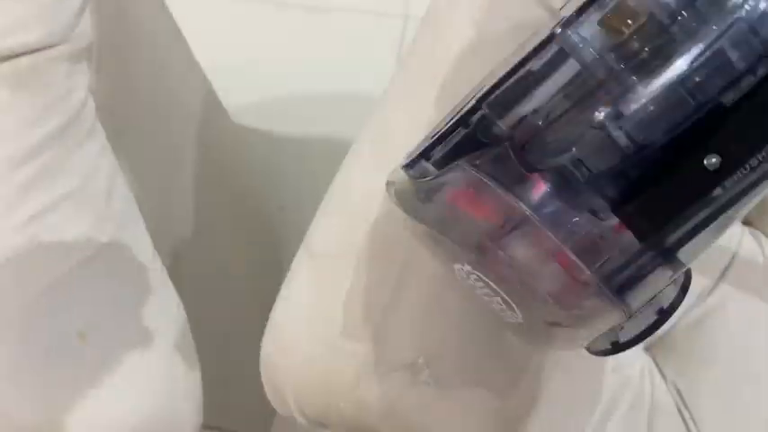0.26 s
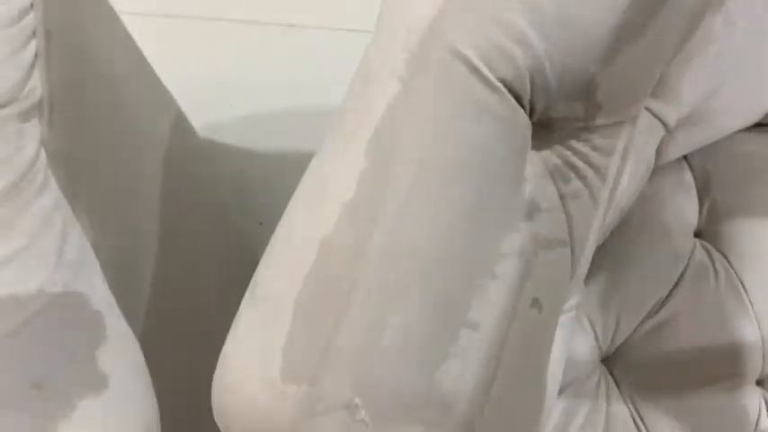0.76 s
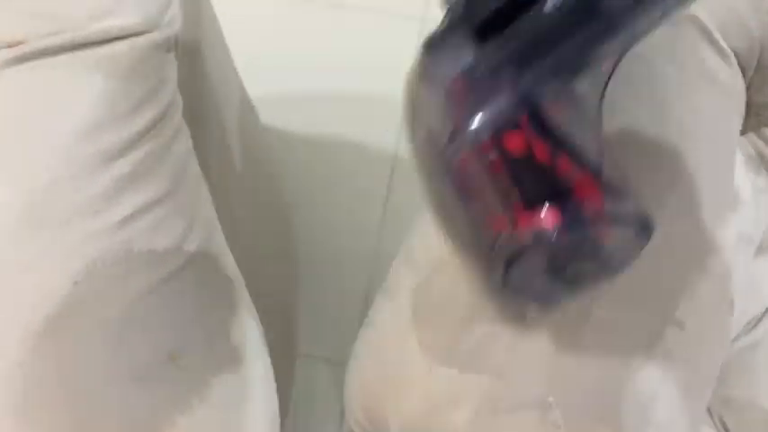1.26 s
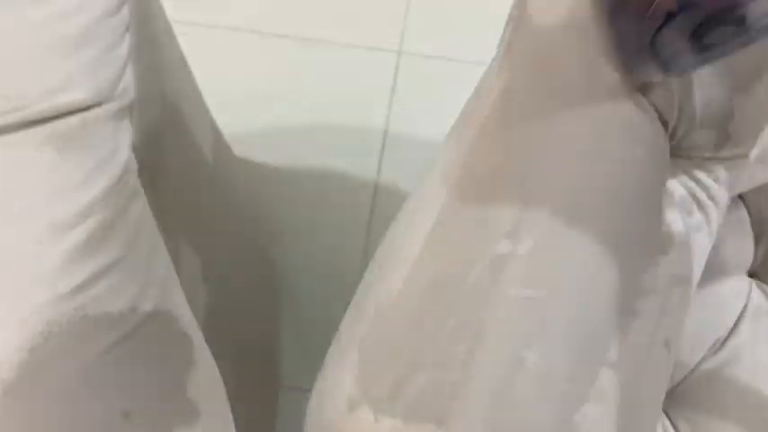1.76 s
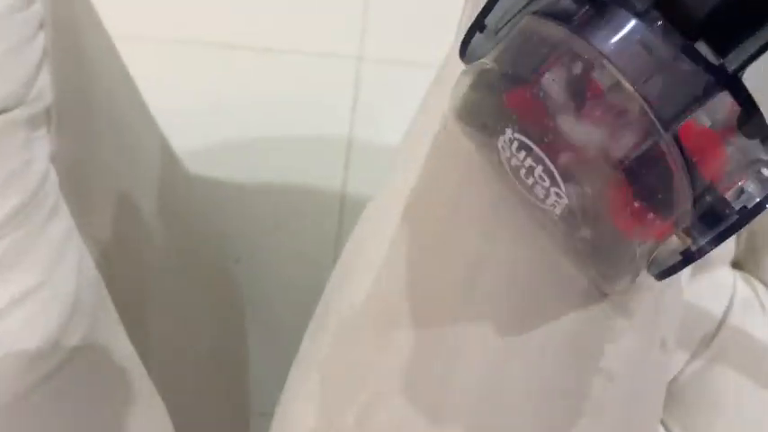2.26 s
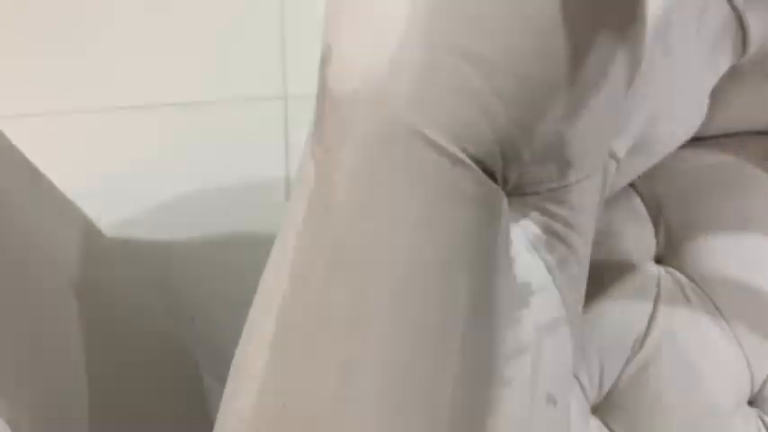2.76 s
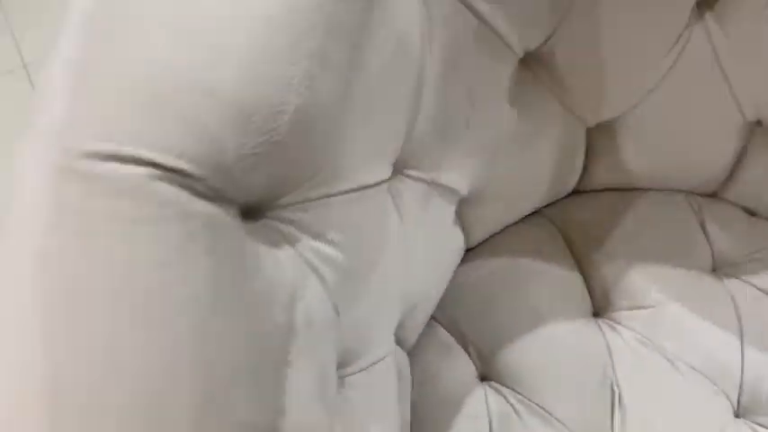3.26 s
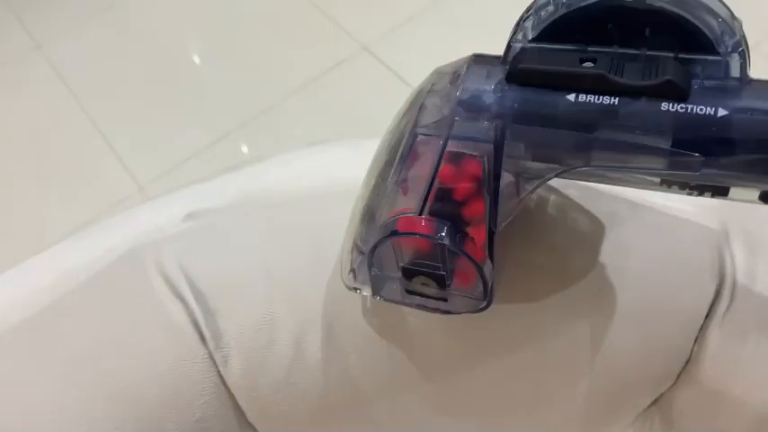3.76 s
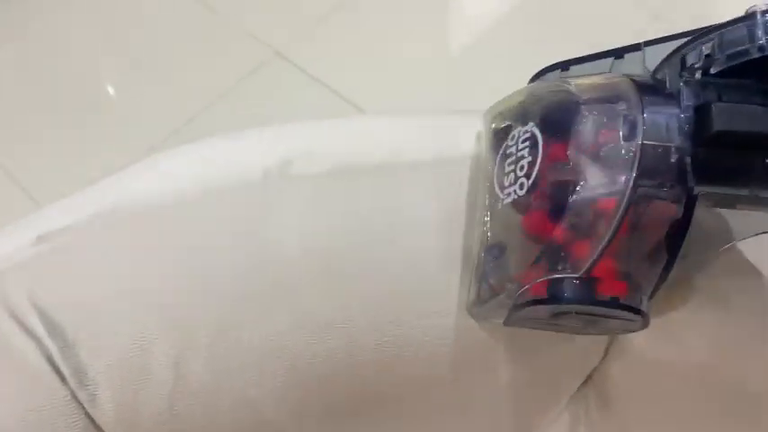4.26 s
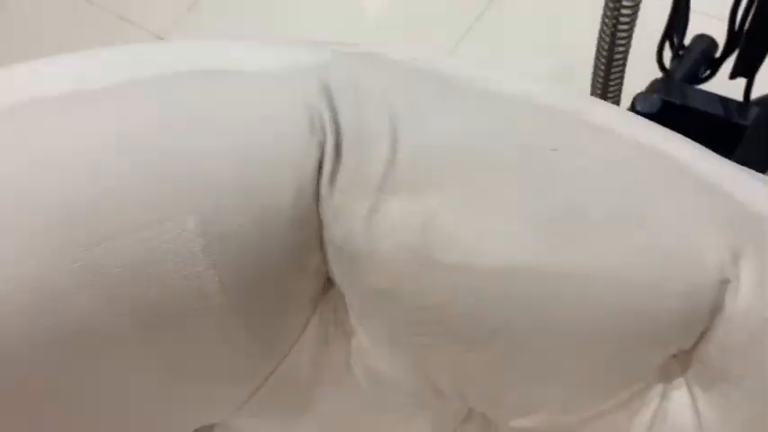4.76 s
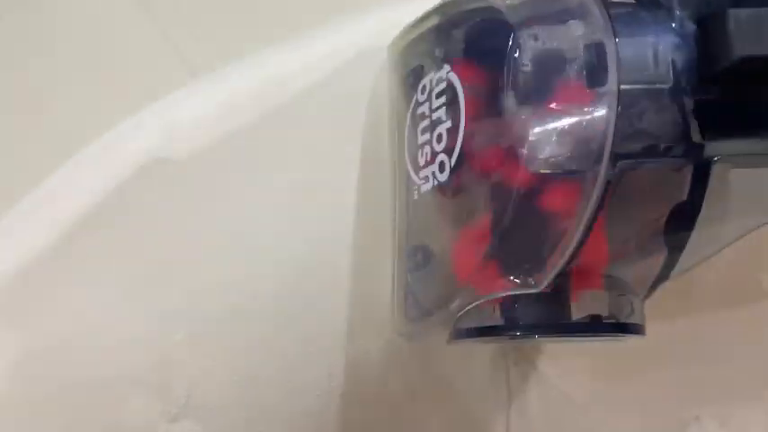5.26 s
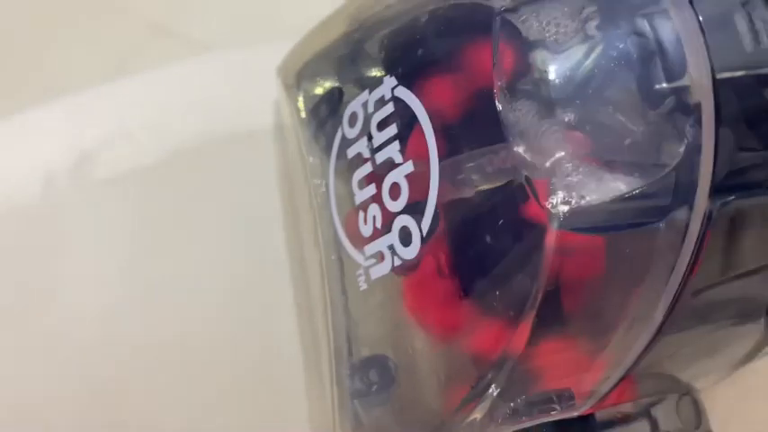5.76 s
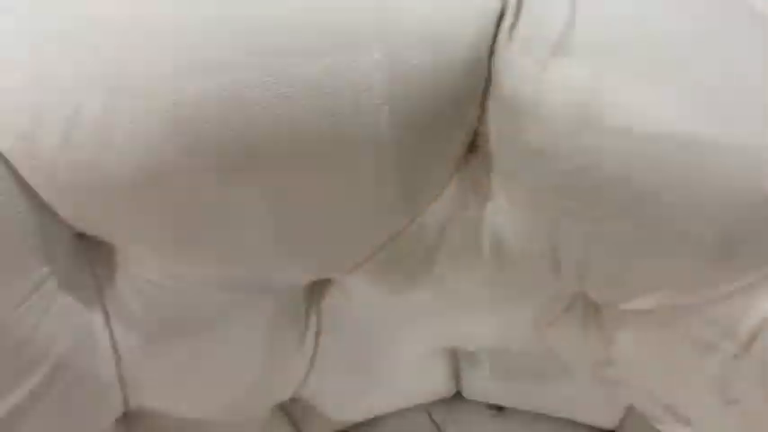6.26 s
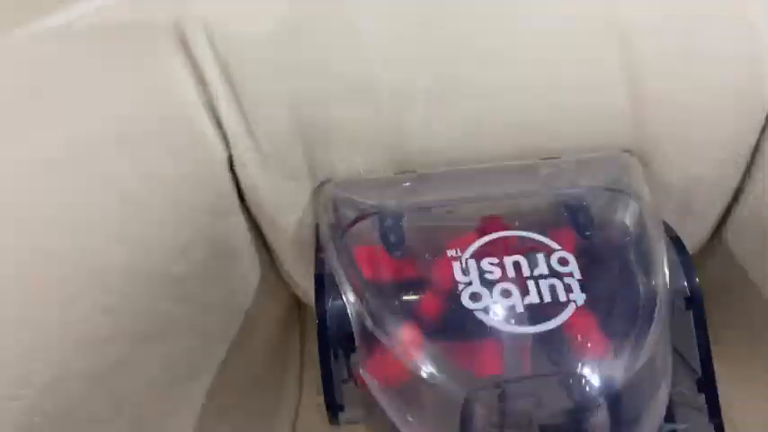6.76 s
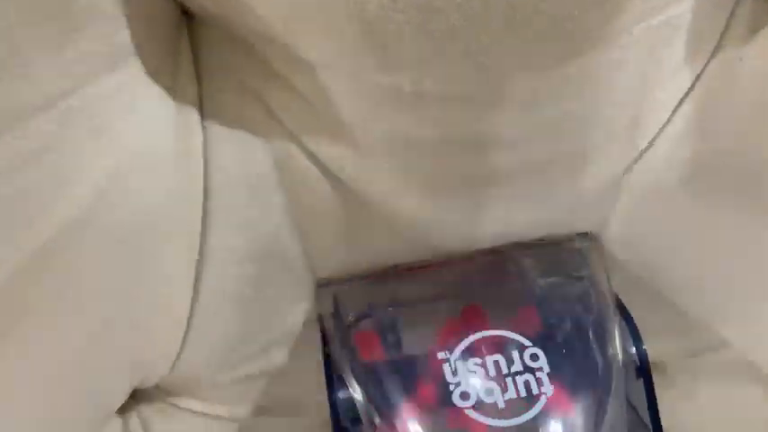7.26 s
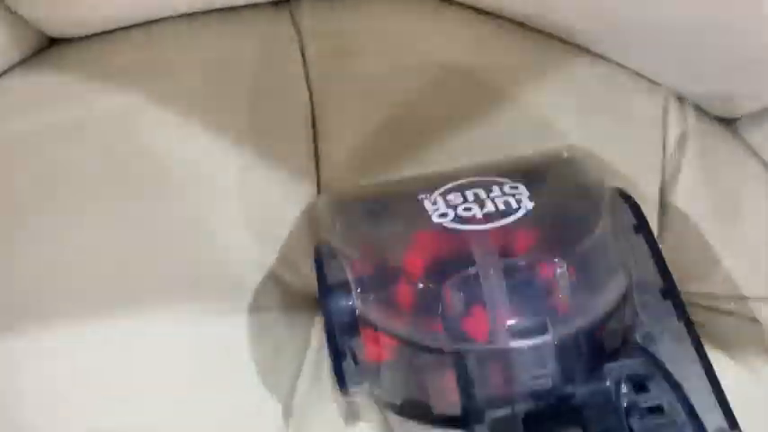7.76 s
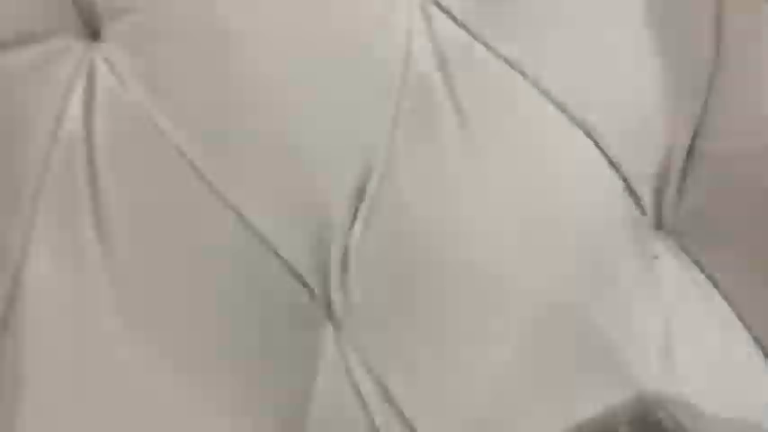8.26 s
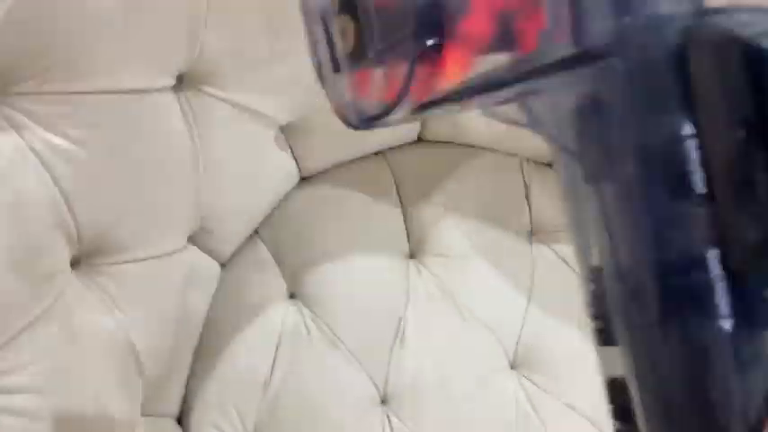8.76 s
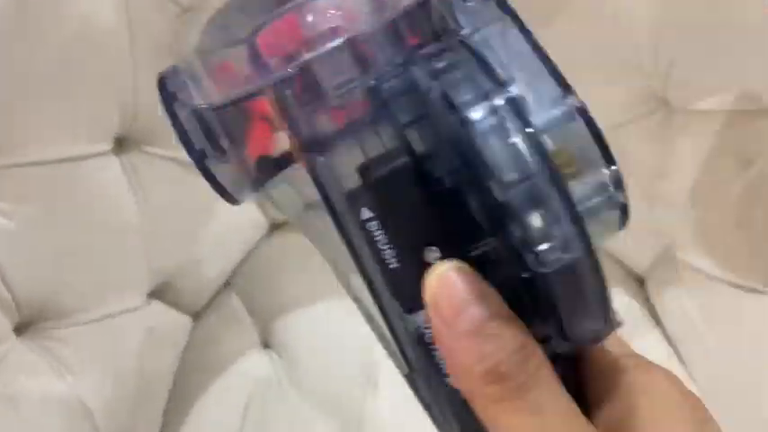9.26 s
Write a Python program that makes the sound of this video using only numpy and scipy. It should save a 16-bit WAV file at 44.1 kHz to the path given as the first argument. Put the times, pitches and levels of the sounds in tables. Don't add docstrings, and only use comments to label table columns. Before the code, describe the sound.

From the first instant an upholstery cleaner is already at full power and never stops over about 9.5 seconds. Broad airy hiss from the nozzle covers a hollow canister drone, low rumble and motor buzz. A thin steady whine near 2.8 kHz cuts through, with a fainter octave. During 0-3 s the brush turbine whistles very high, fluttering and dipping with quick strokes; hiss thins around 0.8 s, and soft bumps come near 2.1 and 2.9 s. From 3.4 s the whine jumps forward and the whistle sits lower. The head lifts around 4.7 s, bumps at 4.9, then hisses close until 6. It lifts again near 6.4 s, then presses hard around 6.8, the whistle dropping sharply. A deeper padded thud lands at 7.5 s. Near 7.9 s the fan whine steps slightly higher and continues through the last strokes to the end. Close, hand-held stereo phone indoors.

```python
import sys
import numpy as np
from scipy import signal
from scipy.fft import rfft, irfft, next_fast_len
from scipy.io import wavfile
from scipy.ndimage import uniform_filter1d, map_coordinates

SR = 44100
rng = np.random.default_rng(int(sys.argv[2]) if len(sys.argv) > 2 else 0)


def pcm_store(signal):
    levels = np.round(np.clip(np.atleast_2d(signal), -1, 1) * 32767)
    wavfile.write(sys.argv[1], SR, levels.astype(np.int16).T)


def rack_gain(trim_db):
    fader = np.asarray(trim_db, float)
    return 10 ** (fader / 20)


N = 418950

BLADE_HZ, EASED_BLADE_HZ, EASED_S, SAG_HZ_PER_S = 2836, 2913, 7.89, 4
BUZZ_PER_BLADE = .3535
OCTAVE_REST_DB = -62
VANES, TEETH = 19, 16
SPELL_EDGE_S = .07
HOLLOW_WIDTH_OCTAVES = .14
SOUND_CM_PER_S = 34300

# time_s, level_db
BLADE_LEVEL = [(2.45, -48.9), (3.03, -40.4), (3.37, -46.9), (3.44, -33.3), (4.07, -33.4), (4.9, -32.9),
               (5.05, -48.3), (5.39, -44.3), (6.13, -35.4), (6.45, -35.7), (6.65, -48.3), (6.98, -39.7),
               (7.62, -41.6), (8.37, -34.3), (8.48, -52.1), (8.63, -39.6), (8.97, -37.1), (9.51, -32.8)]
# time_s, extra_path_to_right_cm, left_shading_db
PHONE_TURN = [(0.88, 6.05, 0.0), (0.96, 5.4, 0.0), (2.53, 5.85, 0.0), (3.13, 7.6, -0.4), (3.39, 7.1, 3.4),
              (3.43, 10.3, 8.4), (4.08, 9.0, 5.0), (4.86, 11.4, -2.8), (5.02, 5.0, -0.1), (5.08, 6.05, 0.0),
              (5.24, 6.3, -0.3), (5.51, 7.6, -1.0), (6.12, 11.1, 1.1), (6.46, 11.1, 1.1), (6.56, 5.0, 0.9),
              (6.63, 3.9, 0.5), (6.95, 5.5, -0.2), (7.44, 5.68, -0.8), (7.55, 6.9, -4.0), (7.68, 6.8, -6.0),
              (7.86, 6.5, -3.0), (8.05, 6.7, -1.0), (8.11, 6.3, -0.7), (8.33, 6.45, 0.5), (8.59, 4.6, -2.6),
              (8.7, 7.1, 10.8), (8.96, 9.3, 7.6), (9.5, 10.5, 7.5)]
# middle_s, length_s, left_loss_db, right_loss_db
HAND_SWAYS = [(0.0, 0.14, 4.0, 4.0), (0.3, 0.16, 2.0, 2.0), (2.15, 0.45, 3.0, 3.0), (3.34, 0.09, 3.0, 3.0),
              (5.1, 0.12, 4.0, 4.0), (6.6, 0.1, -3.0, 0.0), (6.7, 0.11, 3.0, 4.0), (7.1, 0.2, -0.5, -1.0),
              (8.49, 0.15, 3.0, 3.0), (0.74, 0.45, -5.5, -5.5), (3.61, 0.2, -1.0, -1.8),
              (4.93, 0.22, 10.6, 1.3), (5.32, 0.22, -3.5, -3.7), (6.47, 0.32, 10.4, -1.0),
              (7.29, 0.27, -0.1, -2.3), (7.47, 0.17, 4.8, 2.2), (8.36, 0.16, 6.6, -0.2),
              (8.71, 0.14, 0.3, -2.3), (8.82, 0.23, -1.4, 4.2)]
# start_s, length_s, level_db
OCTAVE_SPELLS = [
    (0, 2.9, -55.5),
    (3.22, .21, -51),
    (3.65, .45, -58),
    (4.2, .4, -54),
    (5, .75, -55),
    (6.75, .8, -54),
    (7.55, .6, -59),
    (8.64, .2, -52),
    (8.84, .6, -55.5),
]
# start_s, length_s, level_db
THIRD_SPELLS = [
    (8.7, .8, -60),
]
# multiple, level_db, swell_share
MOTOR_BUZZ = [
    (1, -57, .5),
    (2, -62, 1),
    (3, -63, 1.8),
]
# start_s, length_s, gain_db
BUZZ_SWELLS = [
    (2.6, .9, 2),
    (3.2, .8, 3),
    (3.5, 1.5, 3),
    (5.4, .95, 5),
    (8.1, .5, 2),
]

# time_s, speed_turns_per_s
TURBINE_SPEED = [(0.05, 493.0), (0.74, 474.0), (0.92, 424.9), (1.46, 430.8), (1.94, 425.2), (2.37, 458.8),
                 (2.91, 461.7), (3.04, 407.0), (3.49, 371.8), (3.88, 400.1), (4.6, 391.9), (4.8, 420.0),
                 (5.3, 408.9), (6.08, 381.2), (6.47, 385.4), (7.32, 463.4), (8.05, 430.6), (9.24, 383.8)]
# middle_s, length_s, loss_turns_per_s
BRUSH_PRESSES = [(0.02, 0.3, 31.1), (0.28, 0.49, 45.6), (0.52, 0.33, 15.0), (1.3, 0.37, 13.3),
                 (1.61, 0.56, 46.3), (2.01, 0.41, 18.5), (1.15, 0.12, -5), (3.62, 0.16, -6),
                 (4.43, 0.14, 4), (5.13, 0.12, 4), (3.38, 0.51, 30.2), (4.15, 0.77, 23.2),
                 (4.96, 0.21, 7.5), (5.83, 1.05, 24.7), (6.58, 0.4, 18.7), (6.83, 0.59, 102.3),
                 (7.06, 0.3, 29.8), (7.29, 0.32, -18), (7.55, 0.2, 8), (7.78, 0.56, 72.9),
                 (8.01, 0.29, 41.2), (8.2, 0.27, 15.0), (8.49, 0.11, 12.3), (8.7, 0.29, 9.8),
                 (8.96, 0.37, 14.2), (0.76, 0.12, -3), (3.69, 0.2, 3.5), (4.12, 0.1, 2), (4.28, 0.12, -2.5),
                 (4.37, 0.1, 2), (6.05, 0.3, 2), (7.22, 0.16, -6), (7.41, 0.16, 6), (8.03, 0.08, 8),
                 (8.1, 0.08, -6), (8.26, 0.08, 4), (8.66, 0.08, 3), (8.85, 0.08, -3)]
# start_s, length_s, level_db
VANE_SPELLS = [(0, .1, -47), (.1, .28, -52), (.38, .34, -49), (.72, .1, -54), (.82, .16, -52),
               (.98, .4, -48.5), (1.38, .22, -53), (1.6, .3, -49), (1.9, .1, -53), (2, .8, -48.5),
               (2.8, .13, -52), (3.44, .24, -53), (3.68, .24, -49.5), (3.92, .08, -54), (4, .54, -49.5),
               (4.54, .24, -58), (4.78, .1, -55), (4.88, .34, -50.5), (5.26, .26, -50), (5.52, .56, -47),
               (6.08, .1, -54), (6.25, .2, -58), (6.45, .16, -52), (6.61, .13, -56), (6.74, .28, -51.5),
               (7.02, .12, -61), (7.14, .16, -56), (7.3, .2, -59), (7.94, .09, -51), (8.03, .07, -58),
               (8.2, .08, -57), (8.28, .14, -50), (8.48, .1, -52), (8.58, .05, -56), (8.64, .09, -48),
               (8.73, .06, -55), (8.79, .1, -49), (8.89, .29, -54)]
# start_s, length_s, level_db
GEAR_SPELLS = [(1.46, .16, -52), (3.89, .2, -48), (4.09, .35, -52), (4.5, .15, -51), (5.06, .3, -49),
               (5.36, .8, -58), (6.56, .09, -51), (6.65, .05, -56), (6.7, .2, -49), (6.9, .04, -56),
               (7.62, .15, -49), (7.9, .13, -55), (8.09, .17, -49), (8.38, .08, -58)]
# start_s, length_s, level_db
HALF_GEAR_SPELLS = [
    (5.05, .45, -57),
    (8.05, .22, -58),
]
# start_s, length_s, level_db
UNBALANCE_SPELLS = [
    (7.06, .27, -56),
    (7.47, .2, -54.5),
    (7.67, .7, -57),
]

# time_s, nearness_db, nozzle_facing_db, left_minus_right_db
HEAD_VIEW = [(.05, -45, -1, 0), (.35, -43, 1, 1), (1.1, -44, 1, 2.5), (2.7, -45, 1.3, .5),
             (2.98, -48, -1, 0), (3.36, -48.5, -.5, .5), (3.48, -44.5, 0, .5), (3.95, -43, 1.5, .5),
             (4.55, -43, 1.5, 1.5), (5, -42.2, 0, 1.5), (5.53, -43, 4, 6.5), (6.08, -45, .5, 2),
             (6.7, -46, 5.5, .5), (7.31, -48.5, 4, 0), (7.75, -46.3, 6, 1), (8.24, -45.7, 4.7, .5),
             (8.86, -44.5, 2, 2), (9.4, -44, -1.5, 3.5)]
# middle_s, length_s, hiss_loss_db, drone_loss_db
HEAD_LIFTS = [(.1, .18, 2, 3), (.22, .14, -1, -1.5), (.61, .2, 2, 2), (.76, .25, 6.5, 2.5),
              (.88, .15, 0, -2), (1.11, .2, 1, 1), (1.25, .15, -1, -1), (1.42, .2, 1, 0),
              (1.8, .26, 3.5, 2), (4.74, .42, 5, 3), (6.21, .3, 4.5, 3), (6.42, .4, 6.5, 0),
              (6.64, .14, -2, 0), (7.4, .16, 1.5, 4), (7.52, .14, -2, -1), (7.86, .3, -2.5, 0),
              (8.3, .1, 3, 3), (8.35, .08, -2, -1), (8.44, .2, 7, -1), (8.72, .14, 5, 2), (9.4, .12, 1, -1)]
# frequency_hz, density_db_per_hz
SUCTION_SPECTRUM = [(2300, -49), (3000, -3.5), (3500, 2), (4100, -5.5), (5100, -1), (6500, -1.5),
                    (8500, -2.5), (10500, -7.5), (12000, -46)]
# frequency_hz, density_db_per_hz
FIZZ_SPECTRUM = [(6500, -12), (8500, -3), (10000, -2.5), (11300, 2), (12800, -1.5), (14500, -0.5),
                 (16000, -0.5)]
# middle_s, length_s, frequency_hz, loss_db
BAND_HOLLOWS = [(.3, .3, 4200, -3), (.45, .9, 2850, 3), (3.15, .7, 4200, 5.5), (3.03, .15, 4100, 4),
                (3.33, .15, 4200, 4), (1.8, 2, 2800, 2), (.77, .15, 4200, 4), (4, 1.2, 3100, -2),
                (4.8, .3, 4300, 2), (5.2, .35, 2900, 5), (5.7, .7, 2080, -3), (5.6, .5, 2620, -3),
                (6.28, .2, 4200, 2), (7.2, .7, 3050, 4), (7.95, .25, 3300, 5), (7.5, .4, 3300, 3),
                (8.2, 1, 1080, -2.5), (7.8, .5, 1550, 2.5), (8.4, .7, 2050, 3), (9.25, .35, 4900, -1.5),
                (9.33, .45, 6700, 5), (1.22, .3, 8500, 2.5), (3.17, .4, 6200, 2), (7.8, .4, 2200, 2.5),
                (6.4, .4, 1550, 4), (3.42, .35, 2250, 5), (2.2, .7, 10800, -2.5), (1.5, .4, 12000, 2),
                (2.75, .45, 15000, 3), (1.55, .3, 14000, -2), (.1, .12, 2750, 4), (2.1, .2, 2700, 3),
                (6.6, .3, 1600, 2), (9.26, .3, 8300, 2), (5.1, .3, 13300, 2), (7.2, .6, 1030, -3),
                (5.12, .3, 1080, -2), (5.15, .4, 12000, 2.5), (3.2, .6, 3550, -3.5), (3.15, .5, 1250, 3),
                (9.28, .3, 5900, 2.5)]
# start_s, length_s, level_db
JET_SPELLS = [
    (6.32, .12, -46),
]
# frequency_hz, density_db_per_hz
JET_SPECTRUM = [(6800, -12), (7600, -2), (8500, 0), (9200, -12)]
# start_s, peak_db, pitch_hz
CUSHION_BUMPS = [(.561, -51, 260), (1.3, -47, 170), (2.064, -44, 290), (2.156, -44, 280), (2.83, -47, 300),
                 (2.88, -45, 265), (4.9, -41, 248), (4.91, -49, 380), (5.859, -48, 170), (6.378, -50, 250),
                 (7.465, -40, 150), (7.47, -38, 115), (8.363, -49, 191), (8.509, -50, 180),
                 (9.23, -49, 280), (9.47, -46, 140)]

# time_s, housing_ring_db, drone_db
CANISTER_VIEW = [(0, -47.5, -42.5), (2.7, -47.5, -42.2), (2.9, -47.5, -44.5), (3.34, -47.5, -44),
                 (3.5, -48.5, -40.5), (4.8, -51, -41), (5.55, -53, -38.7), (6.1, -54, -42.5),
                 (6.7, -52, -41.5), (7.3, -49.5, -44), (7.75, -46, -40), (8.3, -50, -44.5),
                 (9.5, -55, -42.5)]
# frequency_hz, width_hz, level_db
HOUSING_MODES = [
    (786.6, 85, 1),
    (1686, 34, -5),
    (1115, 15, -1),
    (455, 25, -9),
    (870, 55, -4),
]
# frequency_hz, density_db_per_hz
DRONE_SPECTRUM = [(400, -24), (680, -13.5), (770, -7.5), (1000, -4.5), (1300, -5.5), (1600, -3), (2050, -6),
                  (2300, -9.5), (2900, -12.5), (3600, -33)]
# frequency_hz, density_db_per_hz
RUMBLE_SPECTRUM = [(60, -18), (130, -7), (180, -11.5), (270, -2.5), (400, -2.5), (550, -2), (750, -4.5),
                   (1100, -11), (1500, -24)]
# start_s, length_s, rumble_gain_db
SUNK_SPELLS = [
    (3.42, .15, 4),
    (4.88, .7, 2.5),
    (7.46, .5, 5),
    (7.96, .62, 2.5),
    (8.38, .18, 2),
    (8.6, .2, -2.5),
    (8.8, .5, 1.5),
]
# frequency_hz, width_hz, level_db
ROOM_MODES = [
    (269, 16, -2),
    (350, 30, -5),
    (425, 40, 3),
    (540, 50, 0),
    (598, 25, 0),
    (680, 45, 5),
]
# start_s, length_s
PHONE_PLACES = [
    (0, 3.25),
    (3.25, 4.15),
    (7.4, 2.3),
]
# frequency_hz, width_hz, gain_db
PLACE_CRESTS = [
    [(190, 40, 2.5), (310, 110, 3), (455, 70, 2.5), (725, 30, -4), (960, 40, 2), (1040, 40, -2.5),
     (1200, 50, -2), (1280, 60, 3), (1420, 30, -2), (1715, 50, 2.5), (1790, 40, -2), (1940, 50, 3),
     (2150, 90, -3.5)],
    [(280, 50, 1.5), (340, 50, -2), (625, 30, -2), (800, 40, -1.5), (855, 40, 2.5), (920, 40, -4),
     (1115, 50, -4), (1170, 40, 2), (1265, 50, -2.5), (1425, 40, -3), (1600, 80, 3), (1685, 40, -3),
     (1760, 60, 3), (2160, 60, -2.5)],
    [(170, 80, 2), (300, 60, 1.5), (400, 60, -1.5), (640, 60, 2), (725, 50, 2.5), (850, 60, -2),
     (960, 120, 3), (1540, 80, -2.5), (1700, 60, -1.5), (1950, 80, -1.5), (2240, 90, -2.5)],
]

# frequency_hz, correlation
PORT_LIKENESS = [(100, 1), (500, .96), (1200, .92), (2400, .65), (3500, .03), (4400, .6), (6400, .68),
                 (9500, .83), (12500, .81), (15500, .62)]
# frequency_hz, phase_rad
PORT_LEAD = [(250, 0), (1400, -.4), (2500, 0), (6000, 0), (8500, -.1), (10800, .15), (13500, .85),
             (15700, .35)]
# frequency_hz, gain_db
MICROPHONE = [(20, -60), (110, -34), (170, -8), (220, 0), (15700, 0), (15780, -70)]


def fan():
    since_s = np.arange(N) / SR - EASED_S
    blade_hz = np.where(since_s < 0, BLADE_HZ, EASED_BLADE_HZ - SAG_HZ_PER_S * since_s) + 1.5 * wobble(3)
    return blade_tone(blade_hz) + octave_tone(blade_hz) + motor_buzz(blade_hz) + third_tone(blade_hz)


def blade_tone(blade_hz):
    right_db, = curves(BLADE_LEVEL)
    path_cm, shade_db = curves(PHONE_TURN)
    lead_cycles = (path_cm + .04 * wobble(7)) * blade_hz / SOUND_CM_PER_S
    level_db = np.array([right_db - shade_db, right_db]) - np.array(bells(HAND_SWAYS))
    return rack_gain(level_db + .4 * wobble(25)) * tone(blade_hz, blur_hz=1, lead_cycles=lead_cycles)


def octave_tone(blade_hz):
    level = np.maximum(heard(OCTAVE_SPELLS), rack_gain(OCTAVE_REST_DB))
    fading_db = 2.8 + np.array([1.6 * wobble(5), 1.6 * wobble(5)])
    lead_cycles = .27 + .072 * wobble(2.04)
    return level * rack_gain(fading_db) * tone(2 * blade_hz, blur_hz=2.5, lead_cycles=lead_cycles)


def third_tone(blade_hz):
    return heard(THIRD_SPELLS) * tone(3 * blade_hz, blur_hz=3)


def motor_buzz(blade_hz):
    swell_db = spells(BUZZ_SWELLS)
    buzz = np.zeros((2, N))
    for k, db, share in MOTOR_BUZZ:
        level = rack_gain(db + share * swell_db + 1.8 * wobble(13))
        buzz += level * tone(k * BUZZ_PER_BLADE * blade_hz, blur_hz=4.48 * k, lead_cycles=.1 * k)
    return buzz


def turbine():
    speed = curves(TURBINE_SPEED)[0] - bells(BRUSH_PRESSES)[0]
    speed = uniform_filter1d(speed, size=2200)
    vane_level = heard(VANE_SPELLS) * rack_gain(1.1 + 1.6 * wobble(14) + 2 * wobble(70))
    vanes = vane_level * tone(VANES * speed, blur_hz=10, lead_cycles=.04 * wobble(1.5))
    gear_level = heard(GEAR_SPELLS) * rack_gain(1.1 + 1.5 * wobble(8) + 2 * wobble(70))
    gear = gear_level * tone(TEETH * speed, blur_hz=10, lead_cycles=.06 * wobble(2))
    half_gear = heard(HALF_GEAR_SPELLS) * tone(TEETH / 2 * speed, blur_hz=8)
    unbalance = heard(UNBALANCE_SPELLS) * rack_gain(3 * wobble(15)) * tone(speed, blur_hz=5)
    return vanes + gear + half_gear + unbalance


def nozzle_air():
    near_db, facing_db, pan_db = curves(HEAD_VIEW)
    hiss_lost_db, drone_lost_db = bells(HEAD_LIFTS)
    seal_db = .35 * wobble(8.3) + .45 * wobble(30)
    suction_db = near_db - .4 * (hiss_lost_db + drone_lost_db)
    fizz_db = near_db + facing_db - hiss_lost_db

    suction = turbulence(closed(SUCTION_SPECTRUM), patchy_db=1.37, with_hollows=True)
    suction = rack_gain(suction_db + 2.5 + seal_db) * suction
    fizz = turbulence(closed(FIZZ_SPECTRUM), patchy_db=2.0, with_hollows=True)
    fizz = rack_gain(fizz_db + .3 * seal_db + .2 * wobble(12)) * fizz
    edge = filtered(fizz, lambda hz: 1 / (1 + (13800 / (hz + 1)) ** 20))
    fizz = fizz + edge * (rack_gain(.55 * (facing_db - 2.2)) - 1)

    spread = .48 + .06 * (-43 - fizz_db + pan_db)
    width = 2.8 * np.clip(spread, .1, 1.2) ** 1.08
    pan = rack_gain([pan_db / 2, -pan_db / 2])
    return diffuse(suction + jets(), np.sqrt(width)) + diffuse(fizz, width) * pan


def jets():
    hiss = unit(filtered(rng.standard_normal((2, N)), closed(JET_SPECTRUM)))
    return heard(JET_SPELLS) * rack_gain(2 * wobble(40)) * hiss


def bumps():
    out, t = np.zeros(N + SR), np.arange(SR // 4) / SR
    for start_s, peak_db, hz in CUSHION_BUMPS:
        shape = rack_gain(-60 * t / .11) * (1 - np.exp(-t / .0073))
        band = signal.butter(2, [.5 * hz, 3 * hz], "bandpass", fs=SR)
        puff = unit(signal.lfilter(*band, rng.standard_normal(len(t))))
        push = np.sin(2 * np.pi * hz * t)
        out[round(start_s * SR):][:len(t)] += rack_gain(peak_db + 3.5) * shape * (push + .74 * puff)
    return out[:N]


def canister_air():
    drone_db = curves(CANISTER_VIEW)[1] - bells(HEAD_LIFTS)[1]
    rumble_db = -55 + .6 * (drone_db - drone_db.mean()) + spells(SUNK_SPELLS) + 1.2 * wobble(5)
    rumble = rack_gain(rumble_db + .44 * wobble(12)) * turbulence(boomy(RUMBLE_SPECTRUM), patchy_db=2.0)
    drone = turbulence(boomy(DRONE_SPECTRUM), patchy_db=.8, with_hollows=True)
    drone = rack_gain(drone_db - .72 + .32 * wobble(8)) * drone
    return diffuse(standing(rumble + drone + housing()))


def housing():
    ring = turbulence(lambda hz: resonances(hz, HOUSING_MODES), patchy_db=.6)
    eased = np.arange(N) >= EASED_S * SR
    pump_hz = np.where(eased, 554.5 * EASED_BLADE_HZ / BLADE_HZ, 554.5)
    pump = rack_gain(-14.5 + 3 * wobble(4)) * tone(pump_hz, blur_hz=2)
    return rack_gain(curves(CANISTER_VIEW)[0]) * (ring + pump)


def standing(pair):
    hz, t, z = signal.stft(pair, SR, nperseg=2048)
    gain_db = np.zeros((len(hz), len(t)))
    for crests, (start_s, length_s) in zip(PLACE_CRESTS, PHONE_PLACES):
        place_db = sum(db * np.exp(-2 * ((hz - c) / w) ** 2) for c, w, db in crests)
        gain_db += np.outer(place_db, plateau(t, start_s, length_s, edge_s=.2))
    return signal.istft(z * rack_gain(gain_db), nperseg=2048)[1][:, :N]


def boomy(spectrum):
    return lambda hz: closed(spectrum)(hz) * (1 + resonances(hz, ROOM_MODES))


def resonances(hz, modes):
    return sum(rack_gain(db) * w * w / (w * w + 4 * (hz - c) ** 2) for c, w, db in modes)


def turbulence(gain, patchy_db, with_hollows=False):
    z = signal.stft(rng.standard_normal((2, N + 512)), nperseg=512)[2]
    patches = uniform_filter1d(rng.standard_normal(z.shape[1:]), size=8, axis=0)
    patches = uniform_filter1d(patches, size=14, axis=1)
    gain_db = patchy_db * unit(patches)
    if with_hollows:
        gain_db = gain_db - hollowed(patches.shape)
    pair = signal.istft(z * rack_gain(gain_db), nperseg=512)[1][:, :N]
    return unit(filtered(pair, gain))


def hollowed(shape):
    hz, t = np.linspace(1, SR / 2, shape[0]), np.arange(shape[1]) * 256 / SR
    middle_s, length_s, center_hz, loss_db = np.transpose(BAND_HOLLOWS)[:, :, None]
    band = np.exp(-(np.log2(hz / center_hz) / HOLLOW_WIDTH_OCTAVES) ** 2)
    return band.T @ (loss_db * hump(t, middle_s, length_s))


def diffuse(pair, width=1):
    def mid_side(hz):
        angle = np.arccos(np.clip(along(PORT_LIKENESS, hz), -1, 1)) / 2
        return np.array([np.cos(angle), np.sin(angle)])
    mid, side = filtered(pair, mid_side)
    return np.array([mid + width * side, mid - width * side])


def tone(hz, blur_hz, lead_cycles=0):
    turns = np.cumsum(hz + blur_hz * wobble(60)) / SR
    if np.any(lead_cycles):
        turns = turns + lead_cycles / 2 * np.array([[1], [-1]])
    return np.sqrt(2) * np.sin(2 * np.pi * turns)


def wobble(rate_hz):
    coarse = np.arange(0, N + 32, 32)
    knots = rng.standard_normal(int(N * rate_hz / SR) + 4)
    return np.interp(np.arange(N), coarse, map_coordinates(knots, [coarse * rate_hz / SR]))


def curves(rows):
    s, *columns = np.transpose(rows)
    return [np.interp(np.arange(N) / SR, s, column) for column in columns]


def plateau(t, start_s, length_s, edge_s):
    since_s = t - start_s if start_s else np.inf
    return np.clip(np.minimum(since_s, start_s + length_s - t) / edge_s + .5, 0, 1)


def hump(t, middle_s, length_s):
    return np.cos(np.pi * np.clip((t - middle_s) / length_s, -.5, .5)) ** 2


def spells(rows):
    t = np.arange(0, N + 32, 32) / SR
    total = sum(high * plateau(t, s, length_s, SPELL_EDGE_S) for s, length_s, high in rows)
    return np.interp(np.arange(N) / SR, t, total)


def heard(rows):
    return spells([(s, length_s, rack_gain(db)) for s, length_s, db in rows])


def bells(rows):
    t = np.arange(0, N + 32, 32) / SR
    totals = sum(np.outer(high, hump(t, s, length_s)) for s, length_s, *high in rows)
    return [np.interp(np.arange(N) / SR, t, total) for total in totals]


def unit(x):
    return x / np.sqrt(np.mean(x ** 2) + 1e-20)


def along(points, hz):
    f, v = np.transpose(points)
    return np.interp(np.log(hz + 1), np.log(f + 1), v)


def closed(spectrum):
    ends = [(spectrum[0][0] / 2, -120), *spectrum, (spectrum[-1][0] * 2, -120)]
    return lambda hz: rack_gain(along(ends, hz))


def filtered(x, response):
    m = next_fast_len(N + 8192)
    return irfft(rfft(x, m) * response(np.fft.rfftfreq(m, 1 / SR)), m)[..., :N]


def scene():
    return fan() + turbine() + nozzle_air() + bumps() + canister_air()


def band_limit(x):
    return signal.sosfilt(signal.butter(12, 15740, fs=SR, output="sos"), x)


def record(dry):
    def ports(hz):
        return rack_gain(along(MICROPHONE, hz)) * np.exp(.5j * np.outer([1, -1], along(PORT_LEAD, hz)))
    hush = unit(filtered(rng.standard_normal(N), closed([(25, 0), (120, 0)])))
    mix = filtered(dry, ports) + rack_gain(-102 + 5 * wobble(6)) * hush
    return band_limit(mix)


dry = scene()
out = record(dry)
pcm_store(out)
```